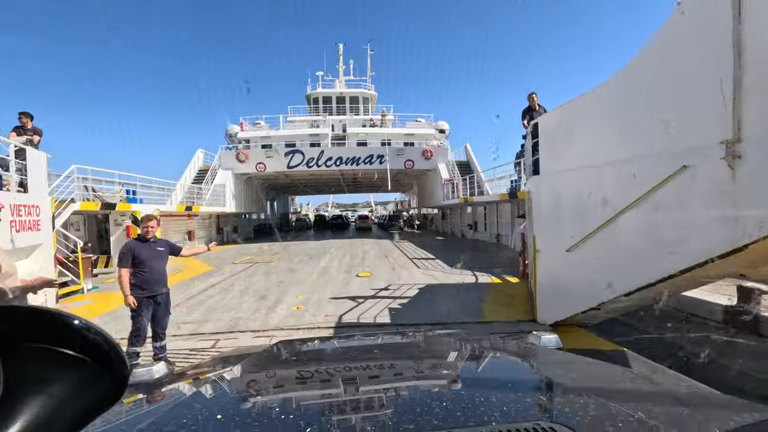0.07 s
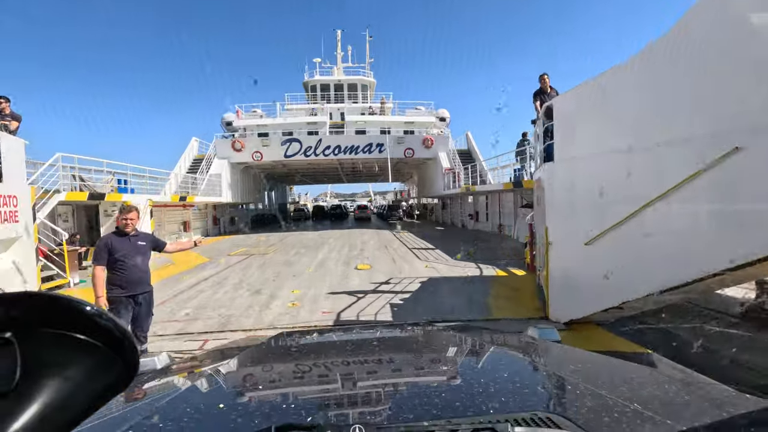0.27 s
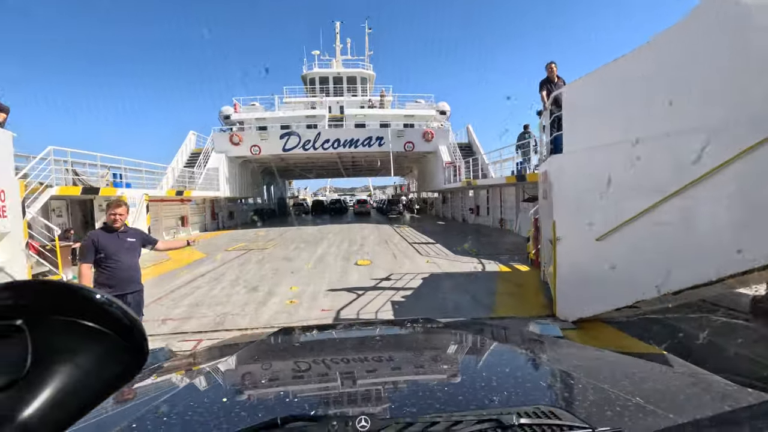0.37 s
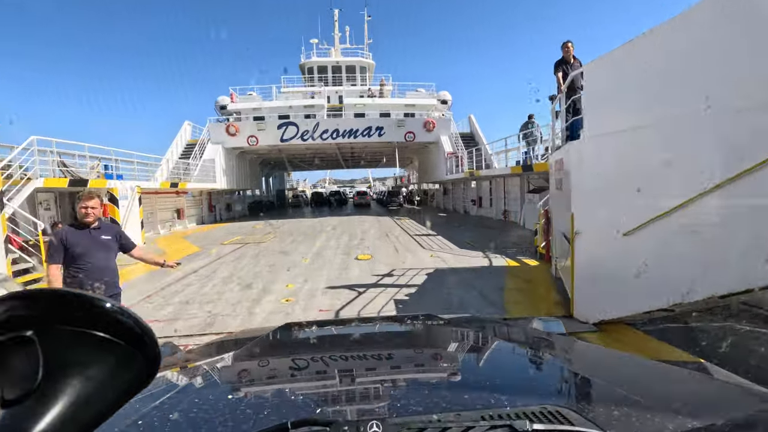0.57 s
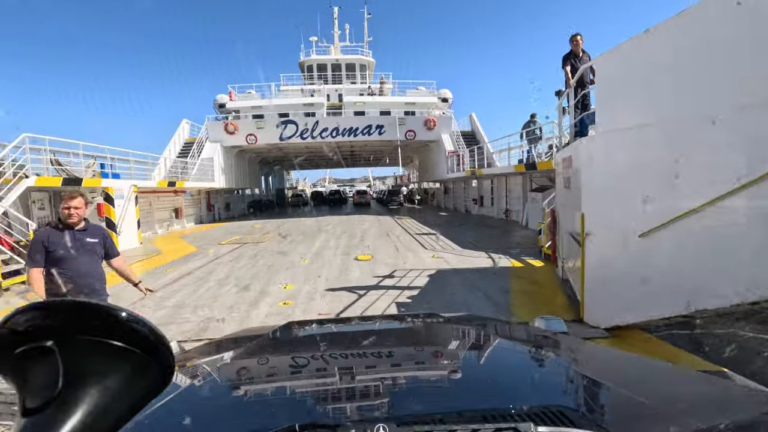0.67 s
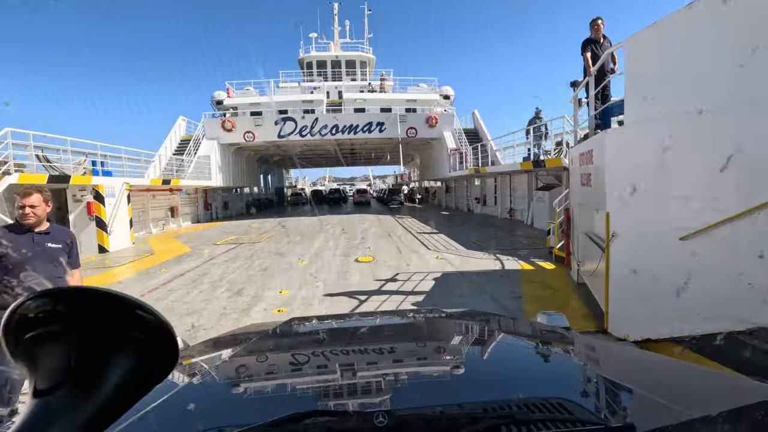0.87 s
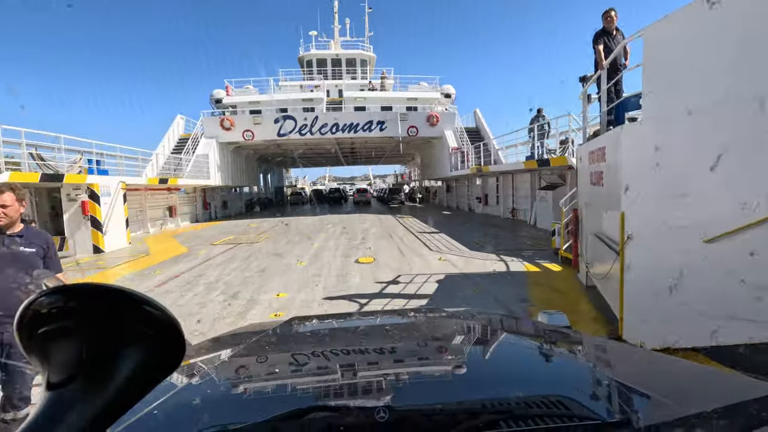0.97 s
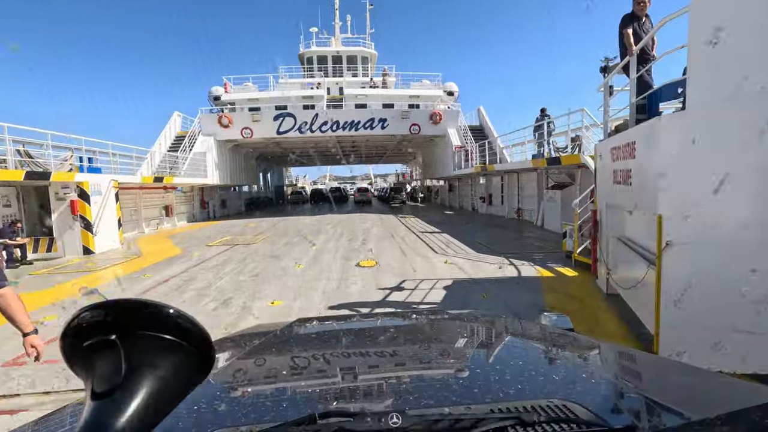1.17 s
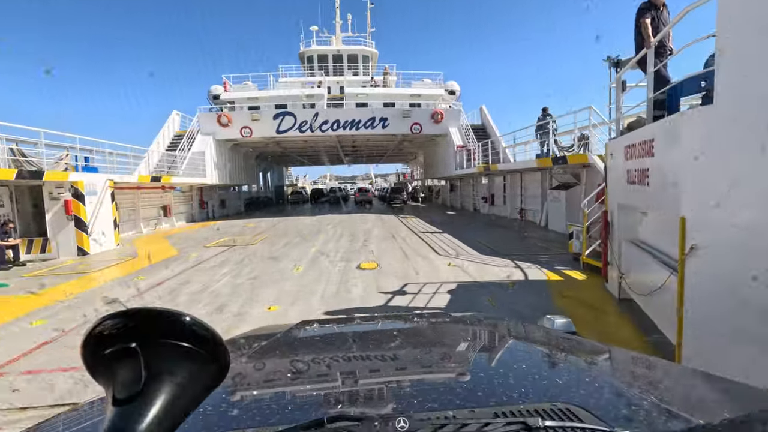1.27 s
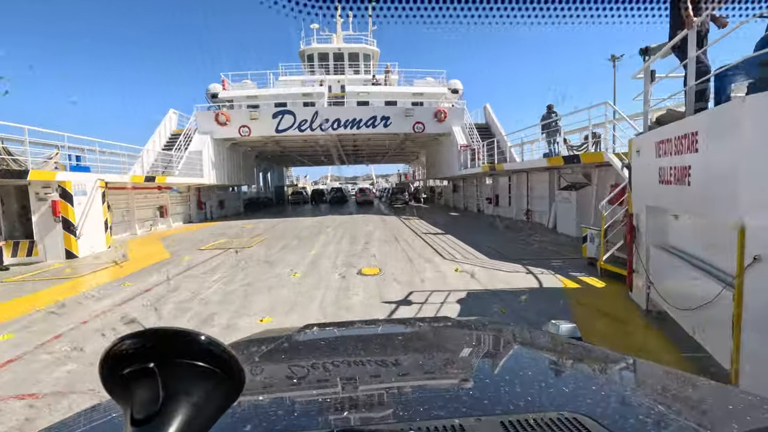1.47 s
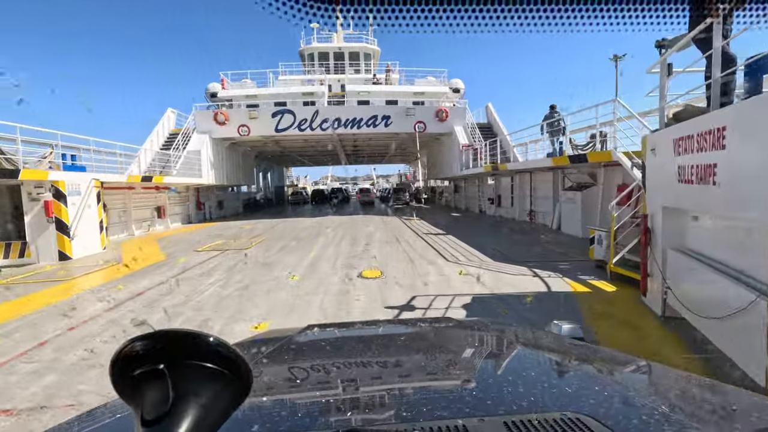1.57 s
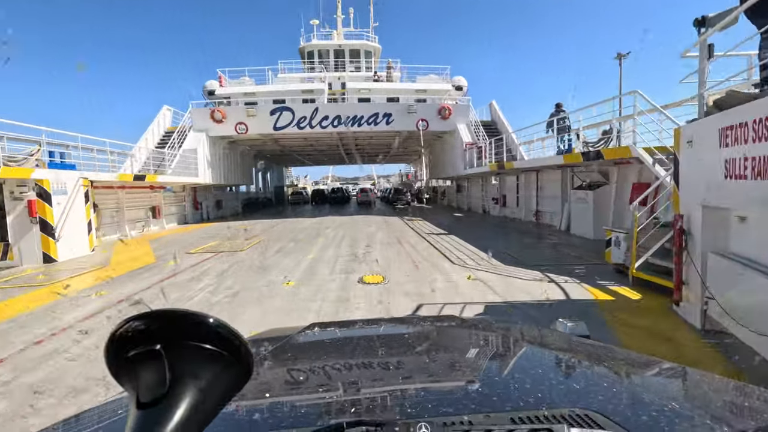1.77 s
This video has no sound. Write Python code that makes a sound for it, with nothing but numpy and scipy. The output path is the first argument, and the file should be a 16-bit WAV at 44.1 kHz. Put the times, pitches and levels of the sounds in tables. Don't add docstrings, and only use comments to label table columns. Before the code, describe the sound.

Heard from a crawling vehicle's cabin, a hard metallic slam and ringing clanks burst over a low diesel hum, knock again more softly, fade, and give way to engine clatter and a buzzing loose panel.

```python
import sys
import numpy as np
from scipy import signal
from scipy.fft import rfft, irfft, next_fast_len
from scipy.io import wavfile
from scipy.ndimage import uniform_filter1d, map_coordinates

SR = 44100
rng = np.random.default_rng(int(sys.argv[2]) if len(sys.argv) > 2 else 0)


def wav_record(signal):
    frames = np.transpose(np.atleast_2d(signal))
    bounded = np.clip(frames, -1, 1)
    quanta = np.round(bounded * 32767).astype(np.int16)
    wavfile.write(sys.argv[1], SR, quanta)


def volts_from_decibels(level):
    exponent = np.asarray(level, float) / 20
    return 10 ** exponent


N = 79380


def unit(x):
    return x / np.sqrt(np.mean(x ** 2) + 1e-20)


def along(points, hz, out=None):
    f, v = np.transpose(points)
    return np.interp(np.log(hz + 1), np.log(f + 1), v, out, out)


def wobble(rate):
    knots = rng.standard_normal(int(N * rate / SR) + 4)
    return map_coordinates(knots, [np.arange(N) * rate / SR])


def filtered(x, response):
    size = next_fast_len(N + 8192)
    spectrum = rfft(x, size) * response(np.fft.rfftfreq(size, 1 / SR))
    return irfft(spectrum, size)[:N]


def rush(spectrum, patchy_db):
    cells = signal.stft(rng.standard_normal(N), nperseg=512)[2]
    patches = uniform_filter1d(rng.standard_normal(cells.shape), 4, 0)
    patches = unit(uniform_filter1d(patches, 8, 1))
    noise = signal.istft(cells * volts_from_decibels(patchy_db * patches), nperseg=512)[1][:N]
    return unit(filtered(noise, lambda hz: volts_from_decibels(along(spectrum, hz, -120))))


def steel(named, dense, t60s, count):
    u = rng.random((count, 3))
    low_hz, high_hz = dense[0][0], dense[-1][0]
    hz = low_hz * (high_hz / low_hz) ** ((np.arange(count) + u[:, 0]) / count)
    level_db = along(dense, hz) + 8 * (u[:, 1] - 0.5)
    t60_s = along(t60s, hz) * (0.93 + 0.26 * u[:, 2])
    return np.vstack([named, np.transpose([hz, level_db, t60_s])])


def ring(modes, size):
    rise_s = 0.00079
    t = np.arange(size, dtype=np.float32)[None] / np.float32(SR)
    hz, level_db, t60_s = (c[:, None].astype(np.float32) for c in np.transpose(modes))
    gain = volts_from_decibels(level_db[:, 0]) * np.sign(rng.standard_normal(len(hz)))
    decay = np.exp(-np.float32(np.log(1000)) * t / t60_s)
    tones = decay * np.sin(np.float32(2 * np.pi) * hz * t)
    return gain @ tones * (1 - np.exp(-t[0] / rise_s))


def contact(length_s):
    rise_s, first_tap = 0.00076, 1.2
    t = np.arange(SR // 10) / SR
    swell = np.exp(-t / max(length_s, 0.001)) * (1 - np.exp(-t / rise_s))
    force = unit(rng.standard_normal(len(t)) * swell) / np.sqrt(len(t))
    force[0] = first_tap
    return force / np.linalg.norm(force)


def struck(knocks, modes, size):
    force = np.zeros(N + SR)
    for s, db, length_s, *soft_hz in knocks:
        keep = np.exp(-2 * np.pi * soft_hz[0] / SR) if soft_hz else 0
        two_poles = np.convolve([1, -keep], [1, -keep])
        knock = signal.lfilter([(1 - keep) ** 2], two_poles, contact(length_s))
        force[round(s * SR):][:SR // 10] += volts_from_decibels(db) * knock
    return signal.fftconvolve(force[:N], ring(modes, size))[:N]


# time in seconds, effort in dB.
EFFORT = [
    (0, -47.5),
    (.2, -42.5),
    (.3, -32.5),
    (.6, -36),
    (.85, -45),
    (1.1, -46.5),
    (1.3, -46),
    (1.45, -40.5),
    (1.8, -41),
]
# multiple of the firing rate, level in dB.
ORDERS_DB = [(1, -47.5), (1.35, -42.5), (2, -37), (2.75, -42), (3, -39), (4, -57), (5, -54.5), (6.5, -42.5),
             (13, -49), (30.5, -60.5)]
# frequency in Hz, level in dB per Hz.
RUMBLE = [(15, -42), (28, -12), (45, -5), (122, -3), (240, -1), (385, -13), (540, -28), (900, -37)]
ROAR = [(300, -12), (525, 1.5), (830, -7.5), (1300, -13.5), (3200, -22.5), (5500, -35), (7500, -44.5),
        (9000, -64.5)]
AIR = [(7000, -48), (8200, -11.5), (9500, 12.5), (11500, 24), (13000, -6.5), (13500, -48)]
# frequency in Hz, level in dB per Hz.
TICK = [(900, -28.5), (1800, 0.5), (3000, -4), (6000, -10.5), (8000, -20), (9500, -28.5), (11500, -25),
        (13200, -33.5)]
# start in seconds, level in dB over the engine roar.
TICKS = [(0.223, 2), (0.24, 7), (0.395, -25), (0.736, -22), (.795, -15), (.862, -4.5), (.895, -20.5),
         (.915, -11), (1.081, -9), (1.139, -12), (1.267, -11), (1.327, -9), (1.35, -10), (1.372, -8),
         (1.394, -8), (1.415, -7), (1.421, -20), (1.433, -28), (1.453, -12), (1.466, -19), (1.484, -18),
         (1.519, -8), (1.53, -9), (1.548, -9), (1.571, -9.5), (1.585, -11), (1.62, -4), (1.631, -10),
         (1.661, -10), (1.694, -5), (1.718, -24), (1.742, -15), (1.753, -11), (1.775, -15)]


def engine():
    firing_hz, firing_wander = 39.5, 0.00573
    t = np.arange(N) / SR
    effort_db = np.interp(t, *np.transpose(EFFORT))
    phase = 2 * np.pi * np.cumsum(firing_hz * (1 + firing_wander * wobble(3))) / SR

    hum = np.zeros(N)
    for order, db in ORDERS_DB:
        level = volts_from_decibels(db + 0.5 + 0.74 * wobble(7.8))
        hum += level * np.sin(order * phase + 1.48 * wobble(4.81))

    throb = 1 + 0.39 * np.cos(phase / 2 + 3.05 * wobble(6.04))
    rumble_db = -35.5 + 0.27 * (effort_db - effort_db.min()) + 0.32 * wobble(37)
    rumble = volts_from_decibels(rumble_db) * throb * rush(RUMBLE, patchy_db=0.14)

    roar = volts_from_decibels(1 + 0.39 * wobble(15)) * rush(ROAR, patchy_db=2.16)
    air_level = volts_from_decibels(effort_db - 11.5) + volts_from_decibels(-43)
    air = volts_from_decibels(-47) * air_level * rush(AIR, patchy_db=-3.0)

    tick_t60_s, tick_rise_s = 0.06, 0.002
    starts, tick_db = np.transpose(TICKS)[:, :, None]
    age = np.maximum(t - starts, 0)
    ticks = volts_from_decibels(tick_db - 60 * age / tick_t60_s) * (1 - np.exp(-age / tick_rise_s))
    clatter_level = (ticks.sum(0) + 0.11) * volts_from_decibels(2.3 * wobble(300))
    clatter = clatter_level * rush(TICK, patchy_db=4.0)
    return hum + rumble + air + volts_from_decibels(effort_db) * (roar + clatter)


# start in seconds, level in dB, pitch in Hz.
PANEL = [(1.328, -49.5, 3270), (1.368, -45, 2110), (1.386, -45, 1900), (1.393, -47, 4020),
         (1.41, -39, 2160), (1.455, -58, 1710), (1.47, -35.5, 2240), (1.49, -42, 2100), (1.51, -46, 2850),
         (1.518, -47, 5100), (1.526, -45, 5170), (1.532, -35.5, 2170), (1.539, -32.5, 2145),
         (1.548, -44, 3030), (1.572, -35, 1390), (1.588, -42, 2500), (1.592, -41, 2110), (1.62, -49, 2700),
         (1.632, -35, 1450), (1.633, -47, 4640), (1.65, -35, 2180), (1.66, -37.5, 2130), (1.678, -55, 2030),
         (1.695, -35, 1470), (1.708, -38, 2290), (1.718, -54, 5000), (1.735, -38, 1270), (1.755, -39, 1414),
         (1.762, -45, 2830), (1.77, -41, 2130)]


def panel():
    buzz_s, t60_s = 0.0037, 0.016
    total = np.zeros(N)
    for s, db, hz in PANEL:
        modes = [(hz, 0, t60_s), (hz * 1.2, -8, t60_s), (hz * 0.91, -9, t60_s), (hz * 0.366, -4, t60_s)]
        total += struck([(s, db + 7.5, buzz_s)], modes, size=SR // 10)
    return total


# pitch in Hz, level in dB, time to fade by 60 dB in seconds.
HOOK = [(1191, 0.5, .14)]
# start in seconds, strength in dB, contact length in seconds.
HOOK_TAPS = [(.002, -38, 0.0066), (.062, -43, 0.0054), (.112, -38, 0.0044), (.128, -46.5, .004),
             (.483, -34.5, 0.0037), (1.03, -49, 0.011), (1.215, -44, 0.012), (1.28, -47, 0.0071),
             (1.33, -50, 0.012), (1.385, -50, .005), (1.54, -44, 0.0062)]


def hook():
    return struck(HOOK_TAPS, HOOK, size=SR // 4)


# pitch in Hz, level in dB, time to fade by 60 dB in seconds.
PIN = [(4264, 0, .09), (4554, 3, .08), (4990, -1, .15), (5259, -9, .12), (5636, -16, .11), (6400, -13, .1),
       (7100, -14, .12), (10400, -22, .05)]
# start in seconds, strength in dB, contact length in seconds.
PIN_KNOCKS = [
    (.238, -56, .008),
    (.462, -41, 0.0071),
    (.484, -25, 0.0088),
]


def hinge_pin():
    return struck(PIN_KNOCKS, PIN, size=SR // 4)


# pitch in Hz, level in dB, time to fade by 60 dB in seconds.
RAIL = [(1497, -8, .5), (1688, -2, .65), (1776, -2, .35), (2024, -5, .5), (2772, -10, .6), (2869, -5, .5),
        (2950, -2, .15), (3004, -1, .9), (3230, -5, .22), (3741, -13, .37), (4382, -8, .33), (4990, -6, .4),
        (6008, -8, .5)]
# start in seconds, strength in dB, contact length in seconds, dull above Hz.
RAIL_KNOCKS = [
    (.113, -48, 0.0032, 1500),
    (.228, -35, .003, 9000),
    (.262, -36.5, 0.024, 9000),
    (.308, -20, 0.0041, 1500),
    (.484, -26, .004, 1450),
    (.572, -22.5, .004, 1210),
    (.681, -31, 0.0031, 1200),
]


def edge_rail():
    return struck(RAIL_KNOCKS, RAIL, size=SR // 2)


# pitch in Hz, level in dB, time to fade by 60 dB in seconds.
LIP = [(2038, 0, 0.045), (2860, 0.5, 0.042), (3180, -3, 0.031), (1225, -2.5, 0.033)]
# start in seconds, strength in dB, contact length in seconds.
LIP_HITS = [
    (.209, -32, 0.0022),
    (.2275, -14, .002),
    (.485, -28, 0.016),
]


def plate_lip():
    return struck(LIP_HITS, LIP, size=SR // 10)


# pitch in Hz, level in dB, time to fade by 60 dB in seconds.
GIRDER = [(280.8, 0.5, 0.28), (340.5, 1, 0.22), (383, -6, 0.16), (500, -13.5, 0.17)]
# start in seconds, strength in dB, contact length in seconds, dull above Hz.
GIRDER_PUSHES = [
    (.24, -21, .02, 900),
    (.29, -21, 0.014, 890),
    (.49, -22.5, 0.019, 900),
    (.535, -18.5, 0.018, 400),
    (.575, -20.5, 0.011, 400),
    (.62, -28, 0.027, 895),
]


def deck_girder():
    return struck(GIRDER_PUSHES, GIRDER, size=SR // 4)


# pitch in Hz, level in dB, time to fade by 60 dB in seconds.
STRUT = [(261, -0.5, 0.071), (317, -1, 0.054), (852, -5, 0.03), (976, -9, 0.066)]
# start in seconds, strength in dB, contact length in seconds, sometimes dull above Hz.
JOLTS = [
    (.203, -23.5, .004),
    (.2285, -5.5, .002),
    (.238, -20, .003),
    (.278, -15, 0.0024),
    (-0.2, -14.5, 0.24, 497),
]


def suspension():
    return struck(JOLTS, STRUT, size=SR // 5)


# pitch in Hz, level in dB, time to fade by 60 dB in seconds.
FLAP = [(1570, -8, 0.083), (1716, -5, 0.25), (1953, -9, 0.27), (2056, 0, 0.27), (2127, 0, 0.072),
        (2380, -9.5, 0.064), (2980, -7, 0.051)]
# pitch in Hz, level in dB.
FLAP_DENSE = [(1100, -51.5), (1500, -4.5), (2200, -7), (3400, -17.5), (4800, -11), (7000, -20.5),
              (8500, -55.5), (12500, -47)]
# pitch in Hz, time to fade by 60 dB in seconds.
FLAP_T60 = [(1500, 0.19), (3000, 0.25), (7000, 0.17)]
# start in seconds, strength in dB, brightness in dB per octave over 2 kHz,
# contact length in seconds.
CLANKS = [(.002, -35.5, -17, 0.0097), (0.107, -40.5, -13.5, 0.006), (.221, -40.5, 10, 0.0017),
          (0.224, -33, -1, 0.025), (0.256, -32.5, 6.5, 0.091), (0.308, -30.5, -2.5, 0.019),
          (0.388, -47, 2, .012), (0.463, -38, -2.5, 0.0037), (0.481, -30, 7, 0.026),
          (0.57, -21.5, -13, 0.0077), (0.608, -37.5, 0.5, 0.026), (0.677, -27.5, -10.5, 0.0065),
          (0.802, -35.5, -10.5, 0.0094), (0.935, -61, 10.5, 0.012), (0.983, -54, 4, 0.011),
          (1.026, -54, 2, 0.0096)]


def flap():
    force = np.zeros(N)
    for s, db, tilt_db, length_s in CLANKS:
        clank = np.zeros(N + SR)
        clank[round(s * SR):][:SR // 10] = volts_from_decibels(db) * contact(length_s)

        def brightness(hz):
            tilt = volts_from_decibels(tilt_db / 6) * (1 + 1j * hz / 2000) ** (tilt_db / 6 - 1)
            return tilt / (1 + 1j * hz / 14000)

        force += filtered(clank[:N], brightness)
    modes = steel(FLAP, FLAP_DENSE, FLAP_T60, count=200)
    return signal.fftconvolve(force, ring(modes, size=SR // 2))[:N]


# pitch in Hz, level in dB, time to fade by 60 dB in seconds.
PLATE = [(148.2, 0.5, 0.28), (210.2, -11.5, 1.3), (244, 4.5, 0.16), (275.3, -4.5, 1.06), (337, -6, 0.96),
         (384, -2, 0.5), (434.4, -0.5, .26), (489, 2, .5), (564.2, -7.5, 1.15), (708, -9, 0.69),
         (861, -16.5, .5), (927, -7.5, 0.36), (1027, -3, 0.35), (1206, -6.5, .7)]
# pitch in Hz, level in dB.
PLATE_DENSE = [(120, -43.5), (250, -10.5), (500, -13.5), (700, -15), (1700, -17), (3000, -14.5),
               (5000, -29), (7500, -30)]
# pitch in Hz, time to fade by 60 dB in seconds.
PLATE_T60 = [(100, 0.42), (300, 0.73), (1000, 0.51), (3000, 0.73), (8000, 0.47)]
# start in seconds, strength in dB, contact length in seconds,
# Hz above which the soft tyre dulls the blow.
BLOWS = [(.198, -34, 0.016, 508), (.209, -26.5, 0.03, 853), (.228, -21.5, 0.015, 3000),
         (.24, -34.5, 0.032, 2570), (0.279, -22.5, 0.081, 900), (.33, -49, 0.028, 605),
         (.472, -23.5, 0.011, 398), (.52, -31, 0.051, 357), (.576, -26.5, 0.0036, 402),
         (.625, -29.5, 0.021, 410), (.72, -31.5, 0.1, 305), (.82, -33, 0.079, 192)]


def ramp_plate():
    modes = steel(PLATE, PLATE_DENSE, PLATE_T60, count=200)
    return struck(BLOWS, modes, size=SR * 3 // 4)


def cabin(hz):
    low, top = 1j * hz / 131, 1j * hz / 6260
    bass_cut = (low ** 2 / (1 + 0.95 * low + low ** 2)) ** 2
    return bass_cut / (1 + 3.02 * top + top ** 2)


def scene():
    small_parts = hook() + hinge_pin() + edge_rail() + plate_lip()
    outside = small_parts + deck_girder() + suspension() + flap() + ramp_plate()
    return (engine() + panel() + filtered(outside, cabin))[None]


def top_cut(x):
    return signal.sosfilt(signal.butter(12, 13280, fs=SR, output="sos"), x)


def record(dry):
    notch_hz, notch_wide_hz, top_hz = 9100, 700, 13400

    def housing(hz):
        gap = notch_hz ** 2 - hz ** 2
        return (hz < top_hz) * gap / (gap + 1j * hz * notch_wide_hz)

    mix = filtered(dry[0], housing)[None]
    return top_cut(mix)


dry = scene()
out = record(dry)
wav_record(out)
```